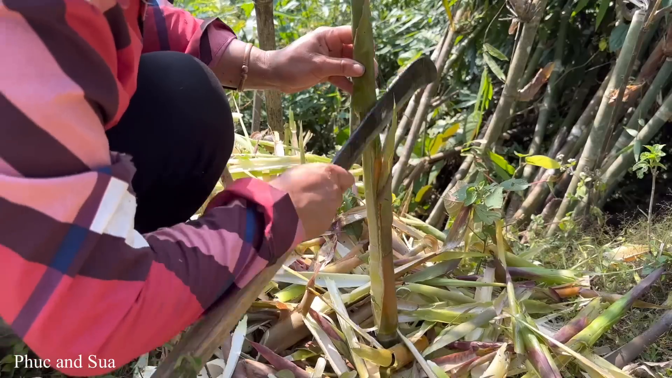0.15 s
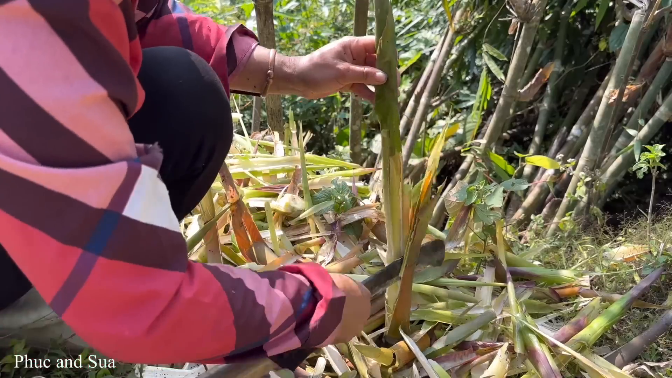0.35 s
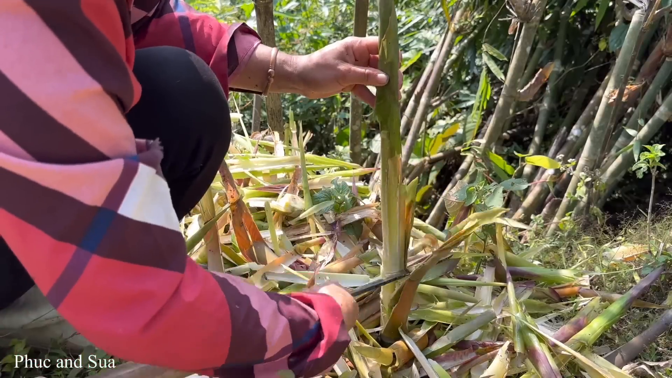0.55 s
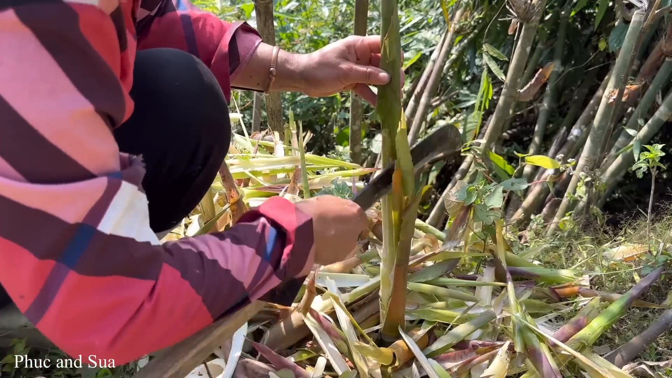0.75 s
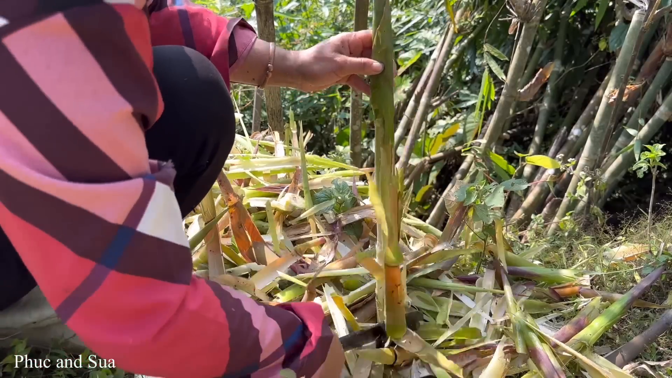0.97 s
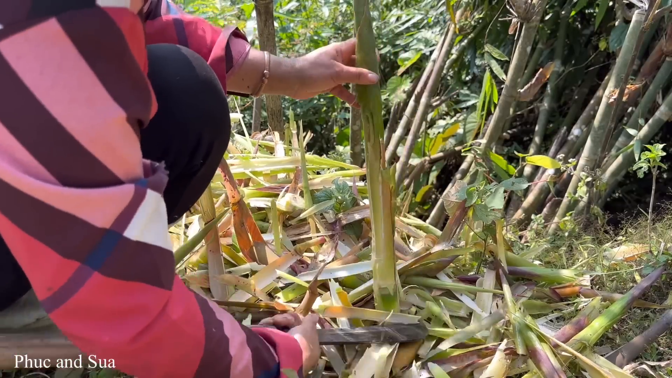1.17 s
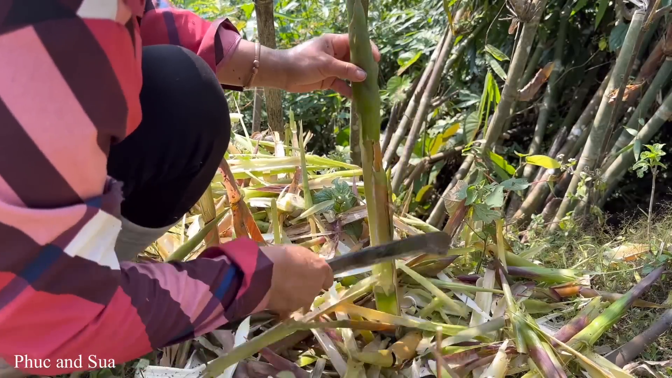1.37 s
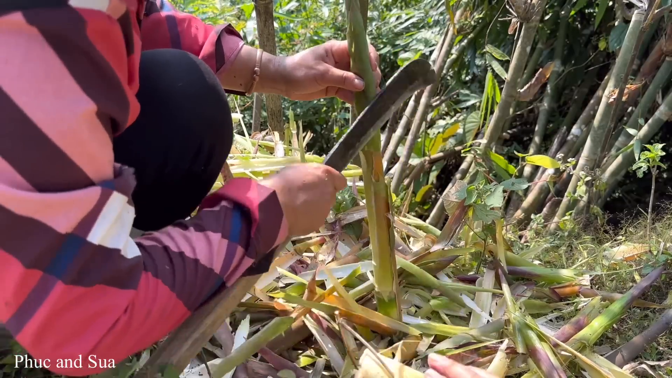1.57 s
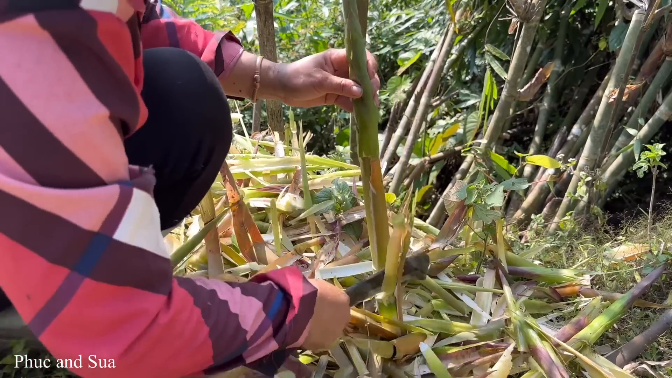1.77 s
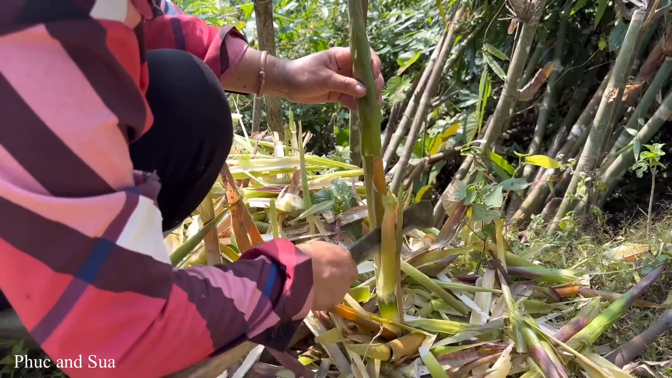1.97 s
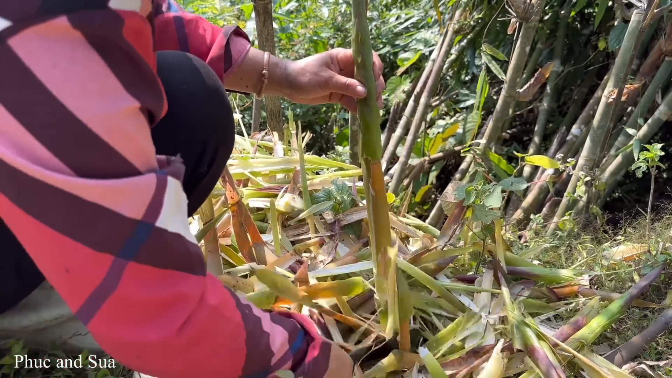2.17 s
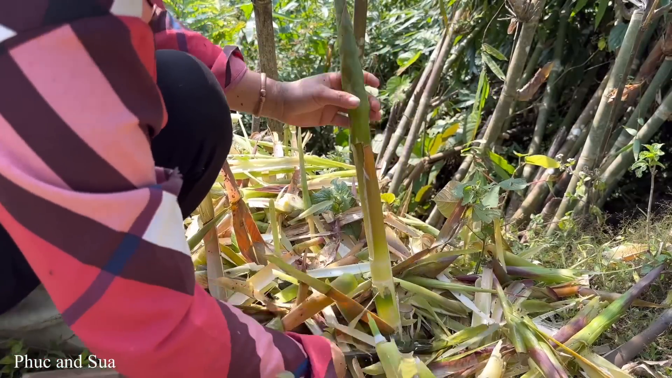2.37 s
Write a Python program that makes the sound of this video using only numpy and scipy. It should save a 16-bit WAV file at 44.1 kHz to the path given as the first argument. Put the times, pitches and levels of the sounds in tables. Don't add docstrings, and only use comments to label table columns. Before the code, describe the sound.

Machete strokes split and strip a green stalk with sharp, crackling, fibrous snaps over dry litter

```python
import sys
import numpy as np
from scipy import signal
from scipy.fft import rfft, irfft, next_fast_len
from scipy.io import wavfile
from scipy.ndimage import uniform_filter1d

SR = 44100
rng = np.random.default_rng(int(sys.argv[2]) if len(sys.argv) > 2 else 0)


def dump(signal):
    limited = np.clip(np.atleast_2d(signal).T, -1, 1)
    pcm = np.round(limited * 32767).astype(np.int16)
    wavfile.write(sys.argv[1], SR, pcm)


def linear_from_db(decibels):
    return 10 ** (np.asarray(decibels, float) / 20)


N = 108045


def evened(x):
    return x / np.sqrt(np.mean(x ** 2) + 1e-20)


def read(points, hz):
    f, value = np.transpose(points)
    return np.interp(np.log(hz + 1), np.log(f + 1), value)


def colour(x, tone):
    log_gain = np.log(linear_from_db(read(tone, abs(np.fft.fftfreq(4096, 1 / SR)))))
    spectrum = np.exp(np.conj(signal.hilbert(log_gain)))
    taps = np.fft.ifft(spectrum).real[:2048]
    return signal.oaconvolve(x, taps / np.linalg.norm(taps))[:len(x)]


def ring(x, hz, width):
    r, w = np.exp(-np.pi * width / SR), 2 * np.pi * hz / SR
    poles = [1, -2 * r * np.cos(w), r * r]
    return signal.lfilter([1, 0, -1], poles, x) * np.sqrt((1 - r * r) / 2)


# (frequency [Hz], phase [rad])
PORT_LEAD = [(0, 0), (2300, .2), (2900, 1.9), (3800, .5), (6500, .2), (7200, -2.4), (7700, -1.9),
             (8300, -.5), (9500, -1.3), (10400, -np.pi), (12250, -np.pi), (13600, -2 * np.pi),
             (15100, -2 * np.pi), (16500, -7.2)]
# (frequency [Hz], level [dB])
PORT_LEAN = [(300, -1), (1500, -2), (2800, -5), (3400, 4), (7500, 2.5), (8600, 0), (16000, 0)]


def ports(x):
    size = next_fast_len(N + 4096)
    hz = np.fft.rfftfreq(size, 1 / SR)
    phase = np.interp(hz, *np.transpose(PORT_LEAD))
    half = linear_from_db(read(PORT_LEAN, hz) / 2) * np.exp(.5j * phase)
    return irfft(rfft(x, size) * np.array([half, 1 / half]), size)[:, :N]


# (frequency [Hz], likeness [0 to 1])
PORT_LIKENESS = [(60, .9), (640, .55), (3100, .3), (7500, .35), (8600, .93), (9600, .65), (10400, 1),
                 (12250, 1), (12800, .65), (13600, 1), (15100, 1), (15800, .5)]


def diffuse(tone, patchy_db):
    frames, hz = N // 256 + 5, np.fft.rfftfreq(1024, 1 / SR)
    a, b, c, d, patch = rng.standard_normal((frames, 513, 5)).T
    patch = uniform_filter1d(patch, size=14, axis=0)
    patch = evened(uniform_filter1d(patch, size=10, axis=1))
    same = np.clip(read(PORT_LIKENESS, hz), 0, 1)[:, None]
    turn = np.exp(-1j * np.interp(hz, *np.transpose(PORT_LEAD)))[:, None]
    left = a + 1j * b
    right = same * turn * left + np.sqrt(1 - same ** 2) * (c + 1j * d)
    gain = linear_from_db(read(tone, hz)[:, None] + patchy_db * patch)
    field = signal.istft(np.array([left, right]) * gain, nperseg=1024, noverlap=768)[1]
    return evened(field[:, :N])


def leaves(x):
    echo_db, echo_t60 = -3, .014
    t, hz = np.arange(4096) / SR, np.fft.rfftfreq(4096, 1 / SR)
    taps = rng.standard_normal((2, 4096)) * linear_from_db(-60 * t / echo_t60) * (t > .001)
    unlike = np.sqrt(1 - np.clip(read(PORT_LIKENESS, hz), 0, .96) ** 2)
    taps = irfft(rfft(taps / np.linalg.norm(taps[0])) * unlike)
    return linear_from_db(echo_db) * signal.oaconvolve(x[None], taps[:, :2048], axes=1)[:, :N]


def fibres(per_s, spread_db, clump_db):
    happens = rng.random(N) < per_s / SR
    size = np.minimum(rng.exponential(1, N), 3)
    sign, slow = rng.standard_normal(N), rng.standard_normal(N)
    clump = evened(uniform_filter1d(uniform_filter1d(slow, size=60), size=60))
    return evened(happens * sign * linear_from_db(spread_db * size + clump_db * np.minimum(clump, 2)))


GRAIN_EDGES = (20, 1500, 3200, 5500, 9500, 20000)


def splinters():
    total = np.zeros(N)
    for band in zip(GRAIN_EDGES, GRAIN_EDGES[1:]):
        sos = signal.butter(2, band, "band", fs=SR, output="sos")
        total += signal.sosfilt(sos, fibres(per_s=7000, spread_db=2, clump_db=2.2))
    return evened(total)


# (frequency [Hz], width [Hz], level [dB])
STEM_MODES = [
    (2450, 380, 0),
    (4300, 800, -5),
    (8400, 1000, -8),
]


def tears(rows, tone, stem_db):
    t, power = np.arange(N) / SR, np.zeros(N)
    for start, rise, hold, t60, db in rows:
        late = np.maximum(t - start - rise - hold, 0)
        attack = np.clip((t - start) / rise, 0, 1) ** 2
        power += (attack * linear_from_db(db - 60 * late / t60)) ** 2
    drive = np.sqrt(power) * splinters()
    stem = sum(linear_from_db(db) * ring(drive, hz, width) for hz, width, db in STEM_MODES)
    return colour(drive, tone) + linear_from_db(stem_db) * stem


# (frequency [Hz], level [dB per Hz])
AIR_TONE = [(15, -56), (25, 1), (102, 1), (307, -5), (348, -6.5), (532, -5), (588, -6.5), (795, -6),
            (10000, -21.5), (13000, -20), (22000, -120)]


def air():
    return linear_from_db(-47.5) * diffuse(AIR_TONE, patchy_db=0.17)


# (time [s], level [dB])
RUSTLE_LEVEL = [(0, -56.5), (.3, -59), (.49, -65), (.63, -54), (.84, -51), (.99, -51.5), (1.12, -47.5),
                (1.25, -58), (1.46, -59), (1.6, -67), (1.77, -54), (1.95, -62), (2.09, -62), (2.25, -59.5),
                (2.45, -49)]
# (frequency [Hz], level [dB])
LITTER_TONE = [(400, -3.5), (1500, -0.5), (3000, -4), (5000, -6.5), (8500, 2), (11000, -1.5), (14500, -3),
               (17000, -1.5)]


def rustle():
    level = linear_from_db(np.interp(np.arange(N) / SR, *np.transpose(RUSTLE_LEVEL)))
    hiss = diffuse(LITTER_TONE, patchy_db=3.5)
    ticks = ports(colour(fibres(per_s=900., spread_db=4.5, clump_db=5), LITTER_TONE))
    return level * (linear_from_db(6.5) * hiss + linear_from_db(-1) * ticks)


# (time [s], peak level [dB], frequency
# [Hz], t60 [s])
SPLINTER_PINGS = [(.2075, -15, 2480, .03), (.2100, -16, 5650, .008), (0.215, -13, 3870, .01),
                  (.2185, -14, 8670, 0.0089), (.2205, -17, 2500, .015), (.2280, -19, 2380, .015),
                  (0.241, -16, 4200, 0.011), (.2450, -21, 2450, 0.016), (.2600, -28, 2400, .02),
                  (.3850, -40.5, 2650, .02), (.4626, -15, 4290, .01), (0.4948, -26, 2470, .012),
                  (.5060, -24, 2430, .015), (.5157, -28, 2300, .012), (0.5244, -14, 2525, .025),
                  (.5250, -16, 5300, .008), (0.53, -12, 2640, 0.014), (.5355, -13.5, 5900, .008),
                  (.8930, -25.5, 3920, 0.0083), (.9095, -25, 2620, .015), (.9145, -20, 2640, 0.022),
                  (0.9257, -12, 4300, .01), (.9260, -18, 1920, 0.011), (.9495, -23, 8760, 0.0074),
                  (.9555, -27, 1980, 0.011),
                  (.0750, -40, 2670, 0.034), (.1030, -39, 1610, .03), (1.0530, -35.5, 2130, .02),
               (1.6135, -39, 4020, .01), (1.6545, -27.5, 4640, .015), (1.6735, -18.5, 8000, 0.013),
               (1.6910, -15, 2400, .012), (1.6915, -16.5, 4070, 0.019), (1.6960, -18, 4330, .012),
               (1.7030, -17.5, 4600, 0.014), (1.7055, -15, 2720, 0.019), (1.7135, -20, 2650, .012),
               (1.7305, -27, 6500, .008), (1.8290, -30, 6800, .015), (1.8825, -35, 9600, 0.023),
               (1.9800, -46, 3480, 0.028), (2.0420, -46, 8400, .03), (2.1150, -44, 9000, 0.011),
               (2.1875, -14.5, 4540, 0.0081), (2.1800, -26, 1070, .04), (2.3600, -37.5, 1150, 0.043),
               (2.4000, -41, 1500, .015), (2.4140, -37, 6460, 0.016), (.4628, -18, 3500, .008),
               (.5300, -22, 900, .03), (.6165, -28, 5000, .01), (.9240, -20, 1250, .03),
               (.9300, -31, 500, .1), (2.1870, -22, 630, .05), (.2345, -22, 900, .015),
               (.3638, -36, 3860, .012)]


def pings():
    rise_s, waver_share = .0005, .06
    out, t = np.zeros(N + 2000), np.arange(2000) / SR
    for s, db, hz, t60 in SPLINTER_PINGS:
        drift = evened(uniform_filter1d(rng.standard_normal(2000), size=30))
        wave = np.sin(2 * np.pi * np.cumsum(hz * (1 + waver_share * drift)) / SR)
        decay = linear_from_db(db - 60 * t / max(t60, .004))
        out[round(s * SR):][:2000] += wave * np.minimum(t / rise_s, 1) * decay
    return out[:N]


# (start [s], rise [s], hold [s], release t60 [s], level [dB])
SPLIT_STROKES = [
    (.186, 0.0087, 0.0052, .02, -38),
    (0.198, 0.0053, 0.026, 0.14, -20.5),
    (0.247, 0.0018, 0.0064, 0.05, -37.5),
    (0.495, 0.01, 0.02, .03, -41),
    (0.5213, 0.003, 0.0096, 0.031, -21),
]
# (frequency [Hz], level [dB])
SPLIT_COLOUR = [(150, -19.5), (750, -12), (1200, -12.5), (2500, -7), (4400, -5), (8500, -8), (11000, -6),
                (15300, -10)]


def splits():
    return tears(SPLIT_STROKES, SPLIT_COLOUR, stem_db=-9)


# (time [s], peak level [dB], ring frequency [Hz], ring
# share [dB], t60 [s])
FIBRE_SNAPS = [(.1877, -37, 3500, -16, .015), (0.2027, -5.5, 8240, 14, 0.0066),
               (0.2337, -3, 2720, 4, 0.0039), (0.2524, -5.5, 2430, 22, 0.0091),
               (.3022, -36, 8260, 16, .015), (.3636, -30, 3860, -19, 0.0075), (.4620, -13, 2460, 3, 0.0075),
               (.4770, -27.5, 2450, -2, 0.021), (.4942, -23, 4340, 0, .016), (.5042, -27, 14000, -4, .012),
               (.5080, -13, 2400, 5, 0.0088), (.5277, -9, 2600, 2, 0.0099), (0.535, -19, 5900, -9, .01),
               (0.5475, -17, 4740, -1, 0.013), (.5577, -20, 5100, -5, 0.012),
               (.6160, -18.5, 14300, 5, 0.011), (.9212, -10, 2730, 11, 0.014),
               (.9327, -2, 6800, -6, 0.0062), (1.501, -39, 2440, 4, 0.013),
               (1.6290, -33.5, 4530, -17, 0.018),
               (1.6528, -25, 3800, -3, 0.019), (1.6740, -16, 3480, 3, 0.017), (1.7697, -25, 4130, 0, 0.007),
               (1.8280, -25.5, 7000, -2, 0.012), (1.8405, -28, 13000, 0, 0.018),
               (1.8621, -20.5, 13200, 2, 0.018), (2.1405, -27, 3970, -2.2, .005),
               (2.1720, -14.5, 3970, 0, 0.0077), (2.1763, -9.5, 6660, 2, 0.01),
               (2.1820, -14, 6000, 3, 0.009), (2.3790, -27, 6640, -5, 0.019)]
# (frequency [Hz], level [dB])
CRACK_TONE = [(300, -31), (1300, -18), (2500, 3), (4500, 2), (8000, 4.5), (11000, 1), (14500, -1),
              (17000, -6.5)]


def snaps():
    rise_s, ring_width = .0004, .2
    out, t = np.zeros(N + 4000), np.arange(4000) / SR
    for s, db, hz, ring_db, t60 in FIBRE_SNAPS:
        decay = linear_from_db(-60 * t / max(t60, .002))
        drive = rng.standard_normal(4000) * decay * np.minimum(t / rise_s, 1)
        sound = colour(drive, CRACK_TONE) + linear_from_db(ring_db) * ring(drive, hz, ring_width * hz)
        top = np.sqrt(uniform_filter1d(sound ** 2, size=60).max())
        out[round(s * SR):][:4000] += linear_from_db(db) * sound / (2 * top)
    return out[:N]


# (time [s], peak level [dB])
STAND_JOLTS = [
    (0.534, -33),
    (.870, -34),
    (1.8309, -29.5),
]


def knocks():
    top_hz, sag_s, rise_s, t60, right_db = 1530, 0.00416, 0.0016, 0.047, -14
    out, t = np.zeros(N), np.arange(4000) / SR
    pitch = 40 + top_hz / (1 + t / sag_s) ** 2
    wave = np.sin(2 * np.pi * np.cumsum(pitch) / SR)
    for s, db in STAND_JOLTS:
        out[round(s * SR):][:4000] += wave * np.minimum(t / rise_s, 1) * linear_from_db(db - 60 * t / t60)
    return out * linear_from_db(np.array([[0], [right_db]]))


# (start [s], rise [s], hold [s], release t60 [s], level [dB])
PEEL_STROKES = [
    (.538, 0.0017, 0.028, 0.058, -40),
    (0.875, 0.015, 0.0033, 0.084, -33.5),
    (0.905, 0.017, 0.008, 0.086, -20),
    (0.944, 0.0032, 0.0089, 0.37, -41),
    (1.649, 0.002, 0.027, .03, -37.5),
    (1.672, 0.0028, 0.0096, 0.048, -31),
    (1.679, 0.0087, 0.024, 0.055, -26.5),
    (1.72, .003, 0.038, 0.083, -46.5),
    (1.859, .003, 0.023, 0.039, -50.5),
]
# (frequency [Hz], level [dB])
PEEL_COLOUR = [(90, -14), (500, -6), (1300, -9), (2500, -4.5), (4300, -3.5), (8900, -7.5), (11300, -3.5),
               (15000, -11.5)]


def peels():
    return tears(PEEL_STROKES, PEEL_COLOUR, stem_db=-25.5)


# (time [s], level [dB], t60 [s])
STUMP_BLOWS = [
    (0.924, -35, 0.2),
    (2.174, -35, 0.11),
]
# (frequency [Hz], level [dB])
STUMP_TONE = [(50, -10), (130, -1), (500, -7), (1200, -9.5), (3000, -50)]


def thuds():
    t, shape = np.arange(N) / SR, np.zeros(N)
    for s, db, t60 in STUMP_BLOWS:
        shape += np.clip((t - s) / 0.0074, 0, 1) * linear_from_db(db - 60 * np.maximum(t - s, 0) / t60)
    return colour(shape * rng.standard_normal(N), STUMP_TONE)


# (start [s], rise [s], hold [s], release t60 [s], level [dB])
CHOP_STROKES = [
    (2.14, 0.0036, 0.036, .02, -45.5),
    (2.171, .002, 0.019, 0.086, -23),
    (2, .003, 0.011, 0.043, -52),
    (1.7, 0.0014, 0.0055, 0.13, -38),
]
# (frequency [Hz], level [dB])
CHOP_COLOUR = [(120, -15.5), (650, -1.5), (1630, -4), (2500, -7.5), (6500, -10), (8900, -7), (11000, -3),
               (15500, -15)]


def chops():
    return tears(CHOP_STROKES, CHOP_COLOUR, stem_db=-9)


def scene():
    near = splits() + snaps() + peels() + thuds() + chops()
    return air() + rustle() + ports(pings()) + ports(near) + leaves(near) + knocks()


def top_cut(x):
    return signal.sosfilt(signal.butter(12, 16800, fs=SR, output="sos"), x)


def record(dry):
    lowpass = signal.firwin(127, 15750, window=("kaiser", 4), fs=SR)
    x = signal.oaconvolve(dry, lowpass[None], "same")
    x = signal.sosfilt(signal.butter(2, 48, "high", fs=SR, output="sos"), x)
    return top_cut(x)


dry = scene()
out = record(dry)
dump(out)
```